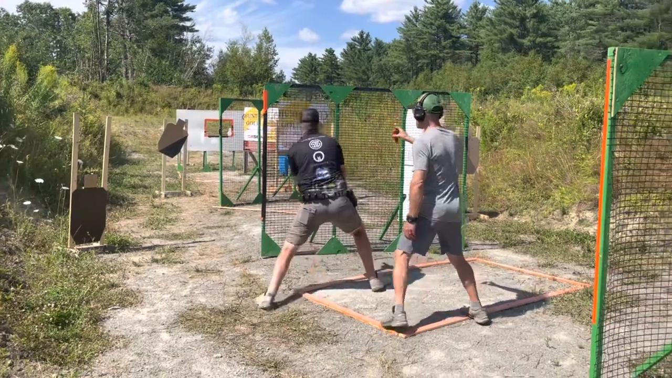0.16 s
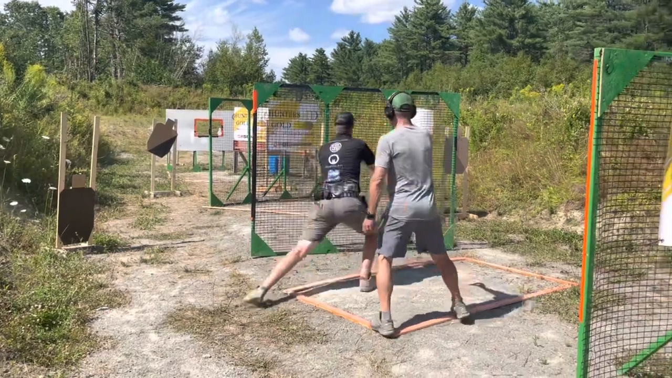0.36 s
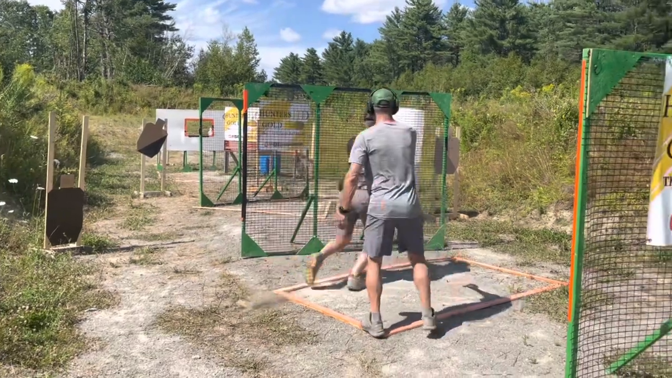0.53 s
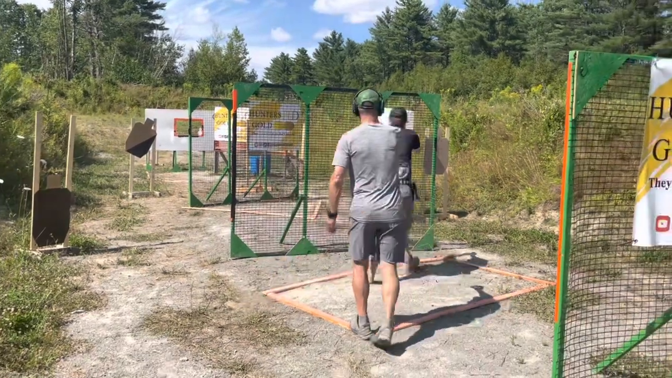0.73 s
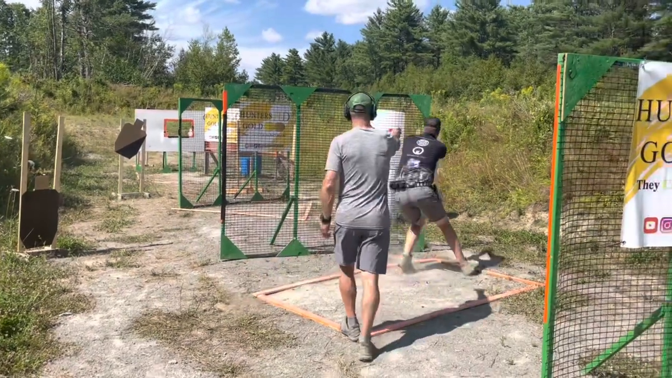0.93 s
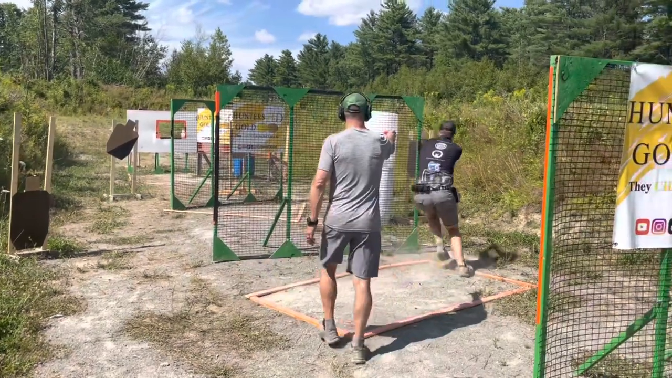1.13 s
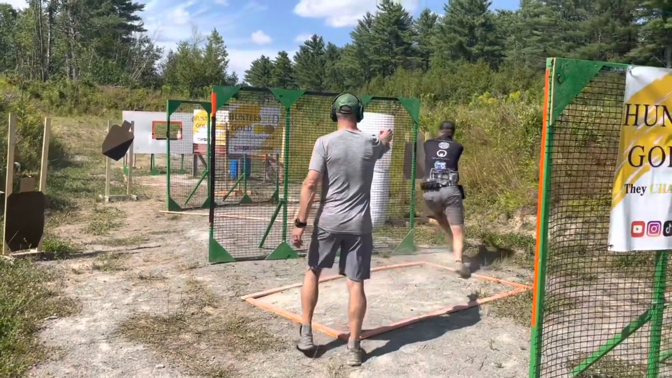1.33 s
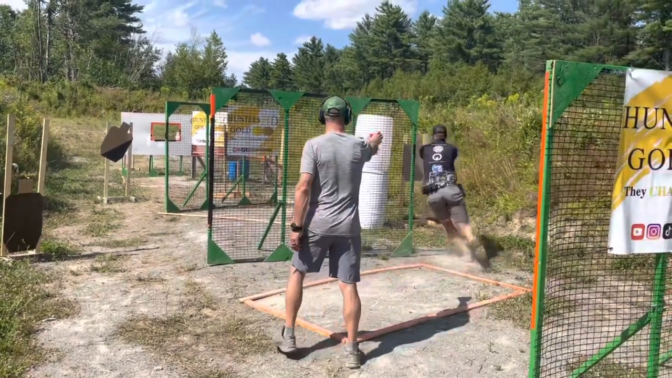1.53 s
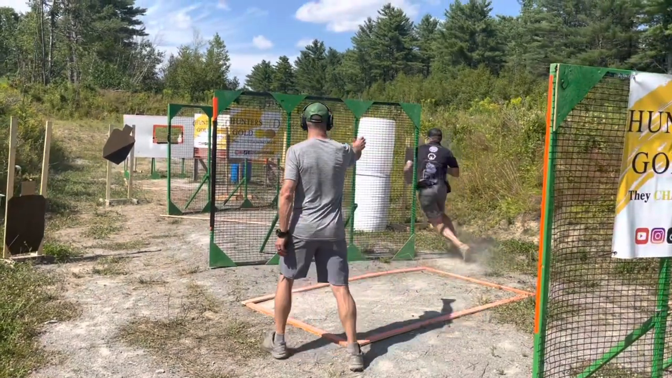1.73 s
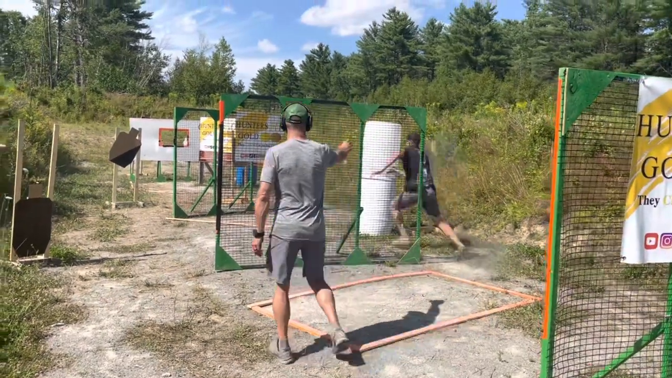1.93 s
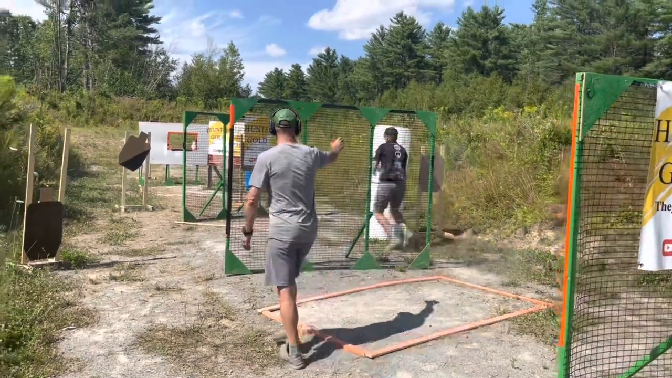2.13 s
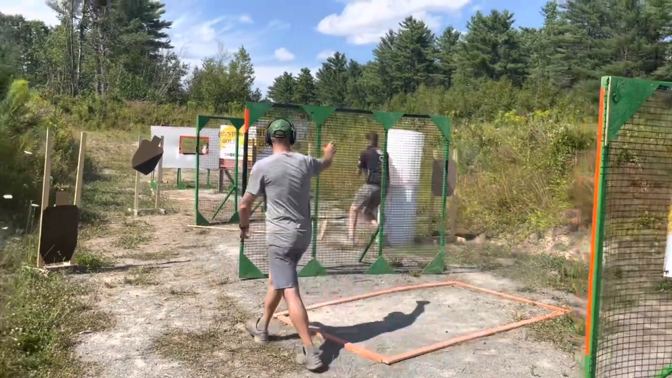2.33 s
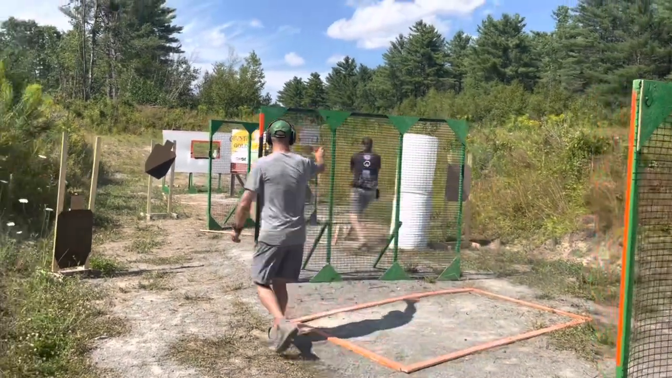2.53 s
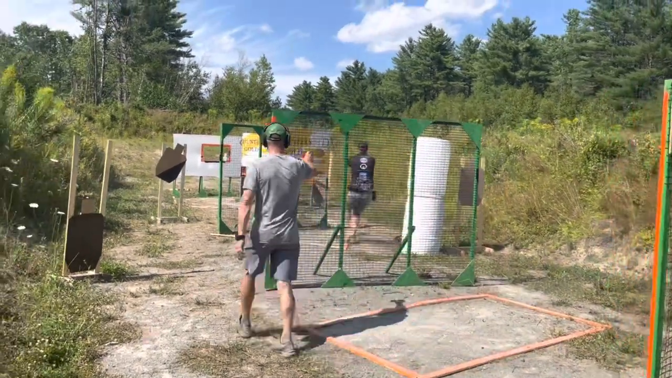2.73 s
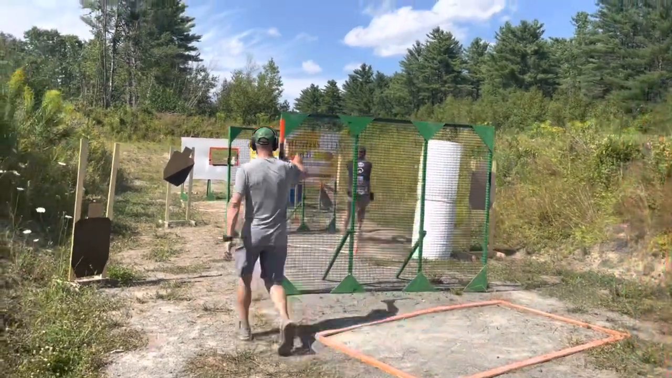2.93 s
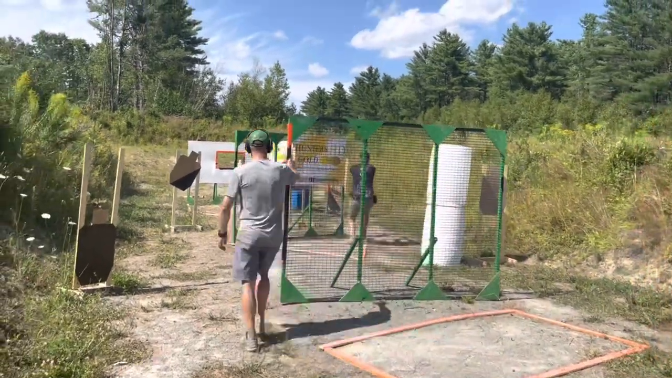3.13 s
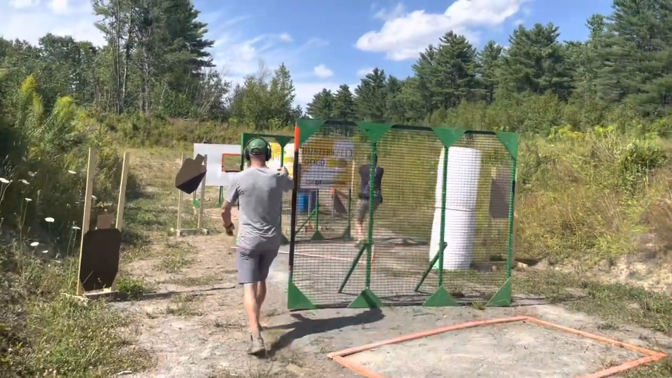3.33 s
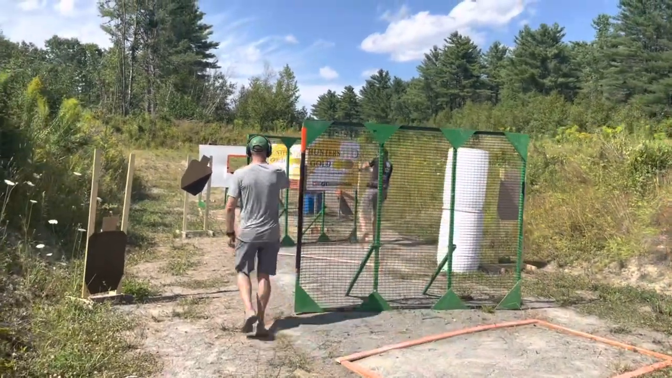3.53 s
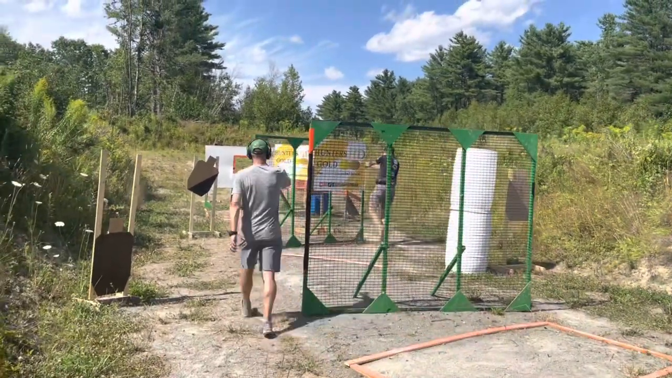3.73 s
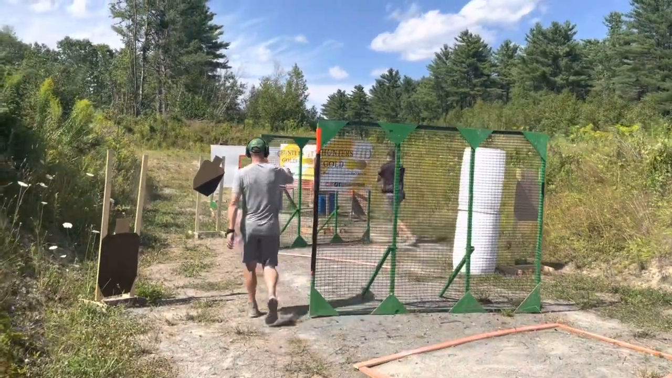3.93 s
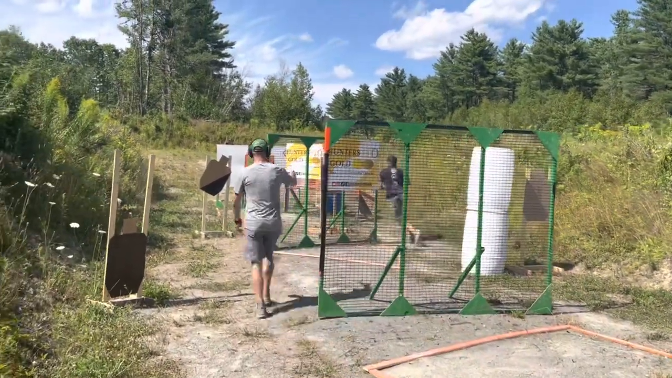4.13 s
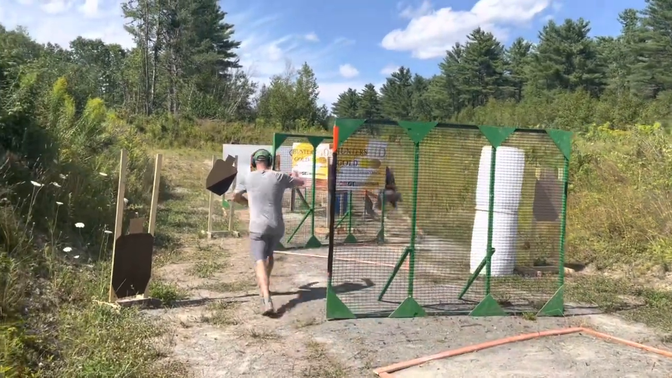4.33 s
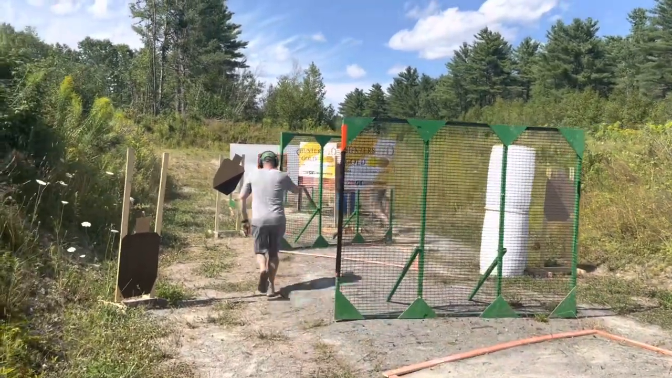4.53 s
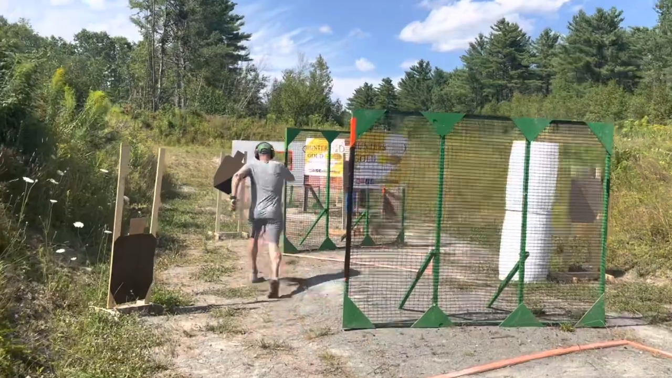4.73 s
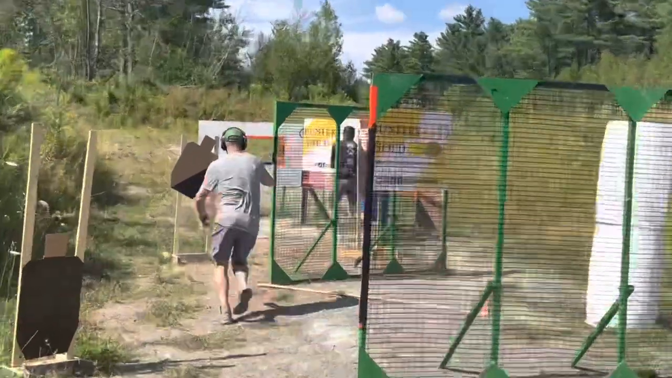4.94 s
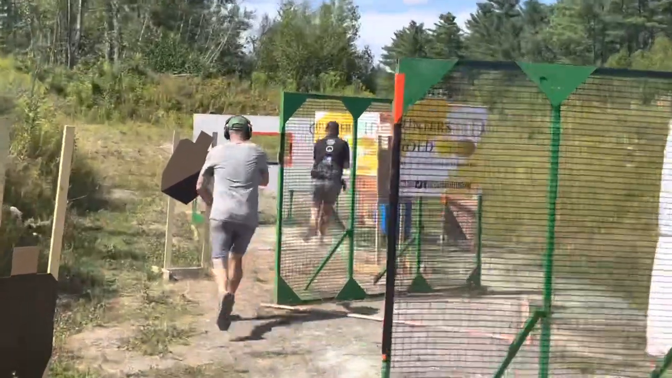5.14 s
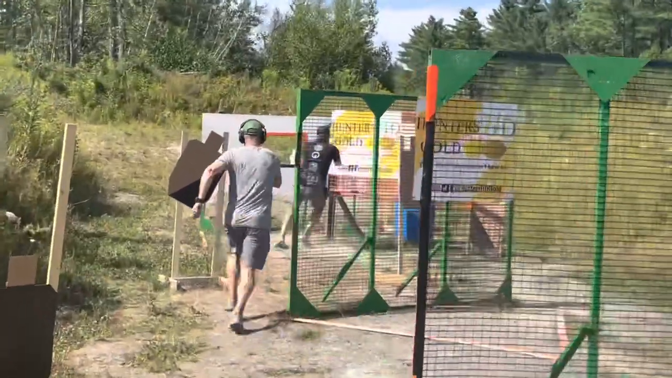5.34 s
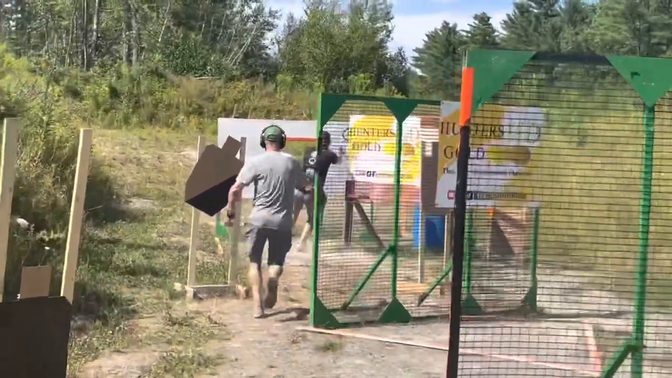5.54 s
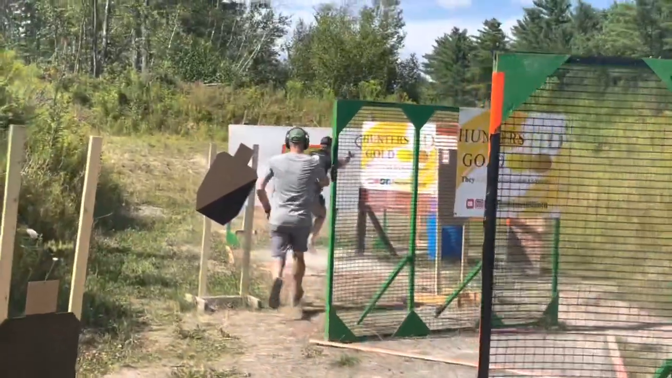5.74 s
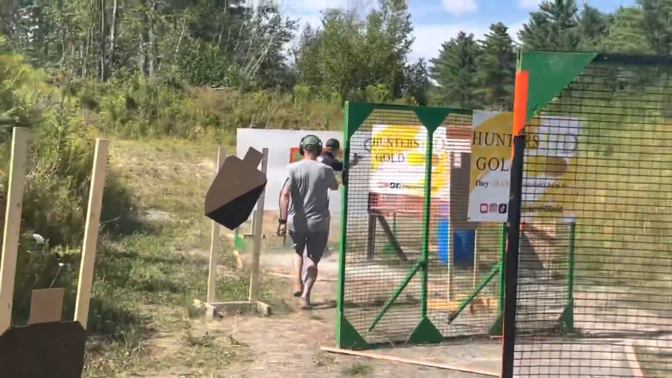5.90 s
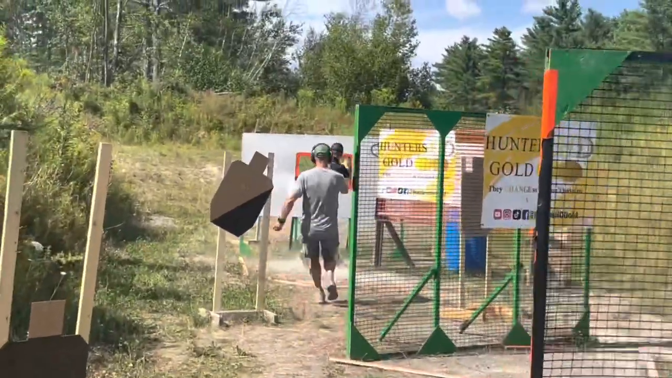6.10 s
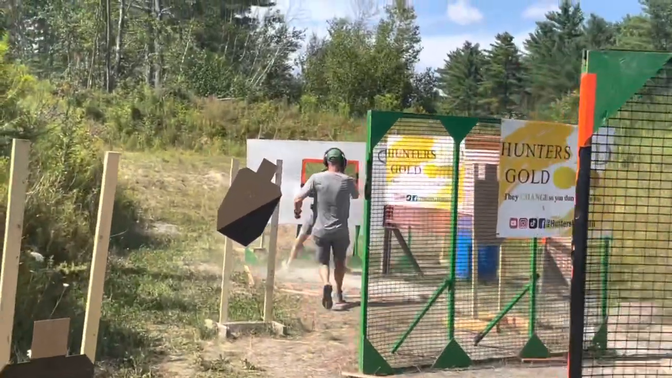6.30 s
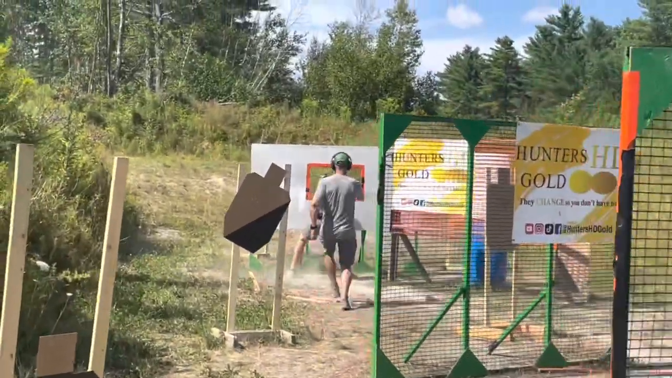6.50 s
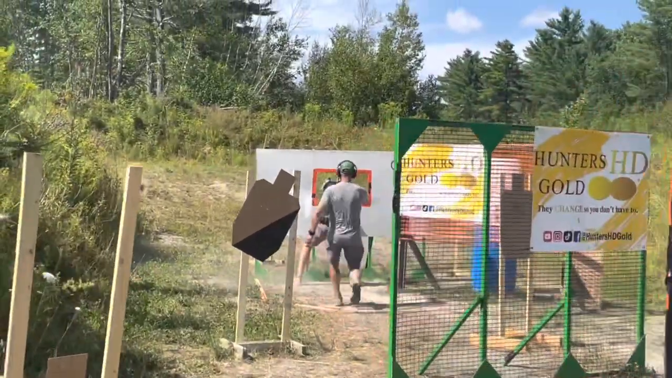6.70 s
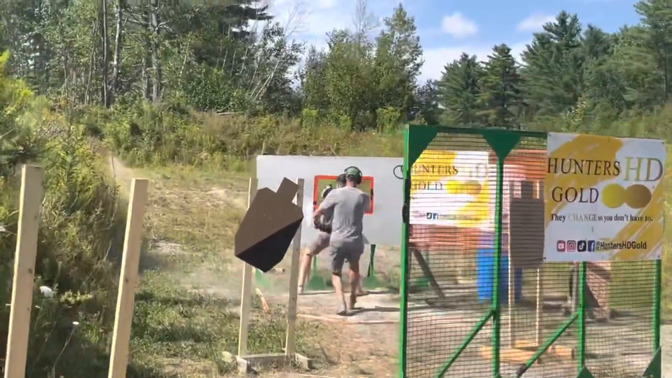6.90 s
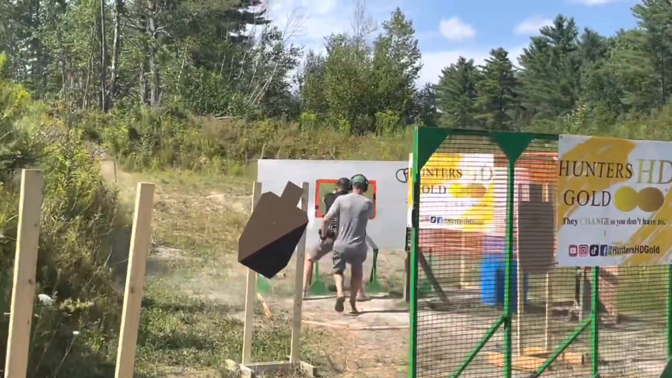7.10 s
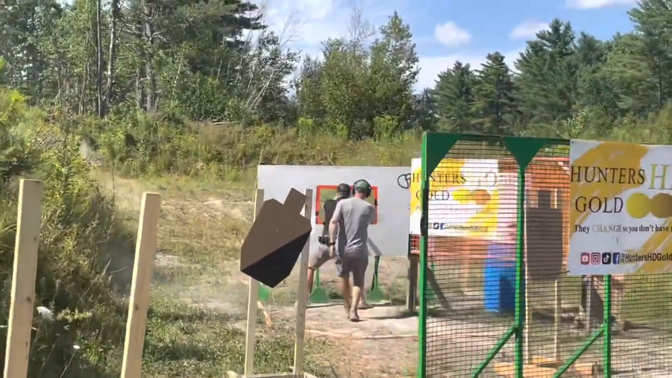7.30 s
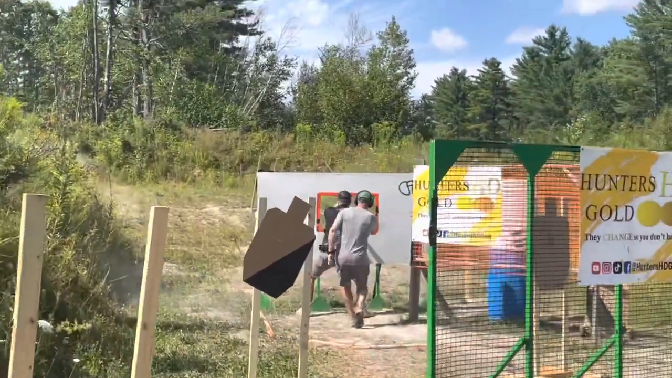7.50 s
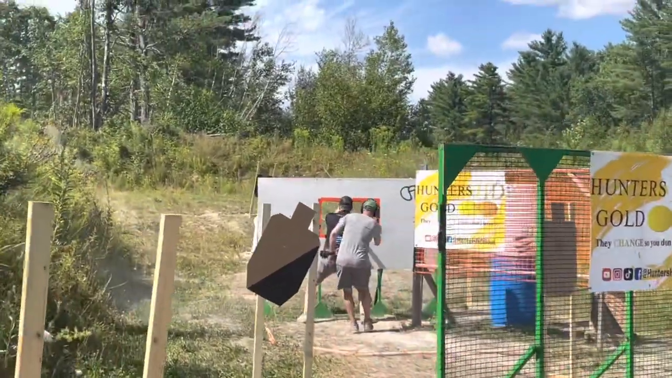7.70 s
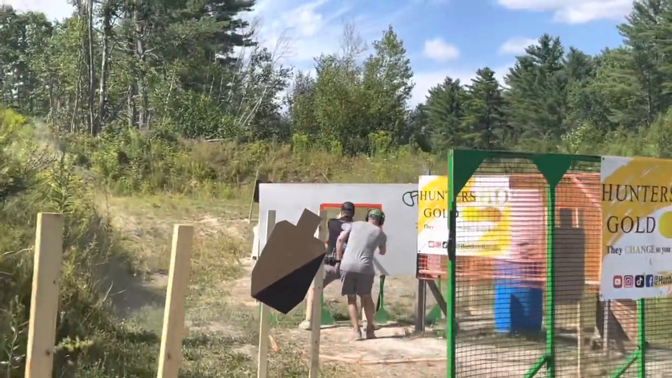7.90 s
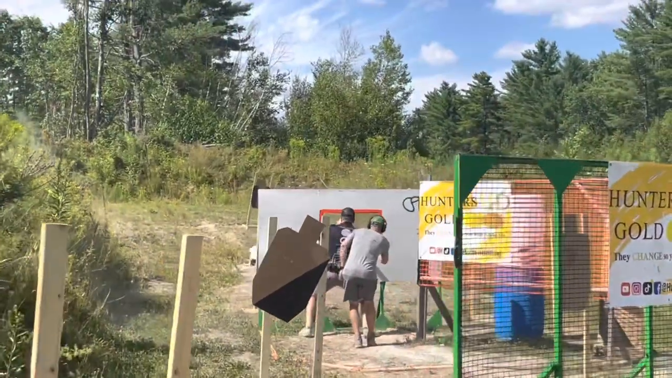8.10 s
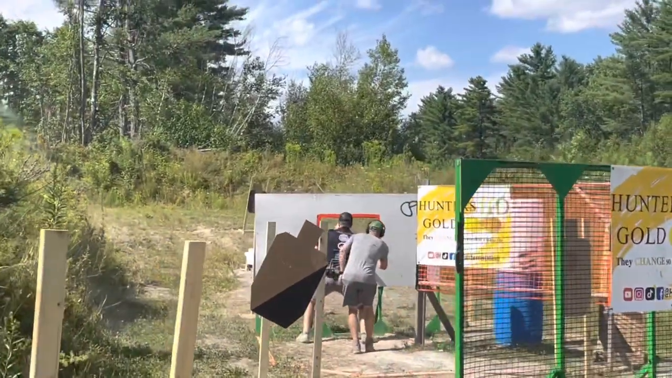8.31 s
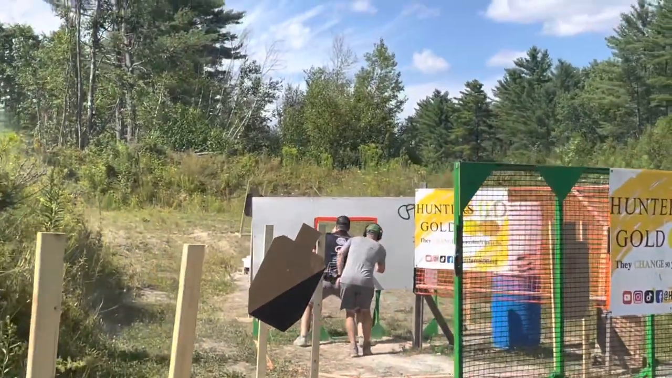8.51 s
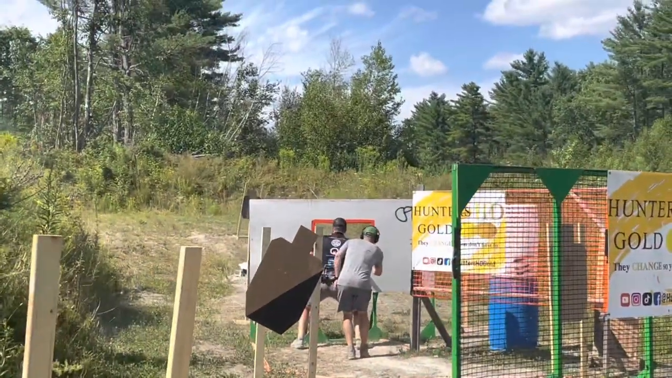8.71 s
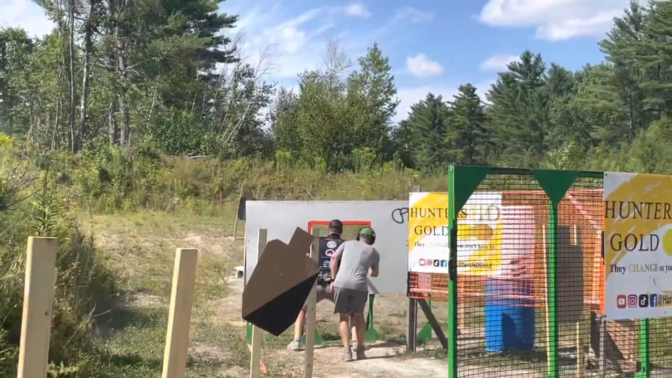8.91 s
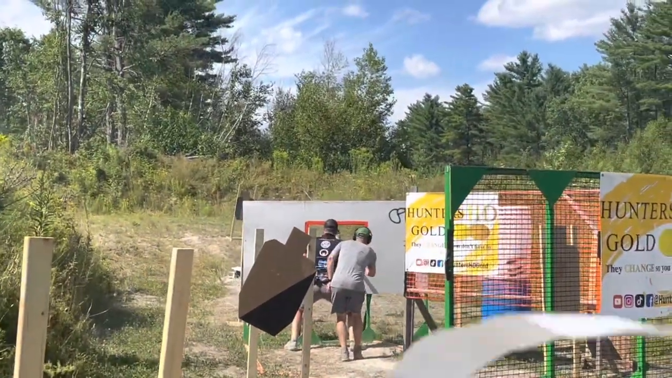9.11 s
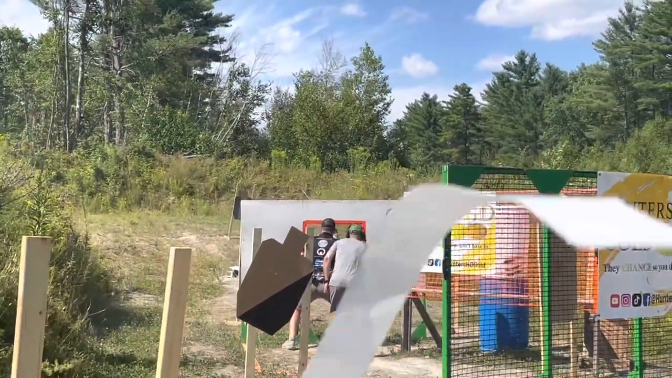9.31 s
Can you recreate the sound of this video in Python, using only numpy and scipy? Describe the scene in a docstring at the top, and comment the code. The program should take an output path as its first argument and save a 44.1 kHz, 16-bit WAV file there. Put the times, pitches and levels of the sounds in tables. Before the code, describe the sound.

A shooter fires fast pairs of booming pistol shots outdoors, each bouncing off banks and trees, while dull pops sound from neighbouring bays.

```python
"""Handgun course in a wooded bay

A competitor fires a handgun from four positions in an outdoor bay with earth banks and forest behind.
Each blast is a pulse plus crackle that bounces off ground, screens and banks; the forest roll is fading noise.
Bullets land as noise smacks, two with ringing sines; dull pops come from neighbouring bays.
Gravel crunches in grainy bursts, mostly under shoes, and shaped noise makes the open air.
The small recorder overloads and turns itself down after every blast."""
import sys
import numpy as np
from scipy import signal
from scipy.fft import rfft, irfft, next_fast_len
from scipy.io import wavfile
from scipy.ndimage import uniform_filter1d, minimum_filter1d

SR = 44100
rng = np.random.default_rng(int(sys.argv[2]) if len(sys.argv) > 2 else 0)


def generate_wav(sig):
    """Save sig (samples, or channels by samples) to the path in sys.argv[1] as 16-bit PCM at SR."""
    pcm = np.round(np.clip(np.atleast_2d(sig).T, -1, 1) * 32767).astype(np.int16)
    wavfile.write(sys.argv[1], SR, pcm)


N = 412335

# In all tables, t60 is the time a sound takes to fall by 60 dB.
# Handgun shots; a negative time means only the tail is heard. Boom and crack tilt the tone:
# (time [s], blast level [dB], extra boom [dB], extra crack [dB])
SHOTS = [(-.13, 6.5, 18.5, -9), (1.2469, -8.5, 4.5, -4.5), (1.43, -6, 3, -4), (3.064, -7, 13.5, 1),
         (3.2618, -10, -4, 4), (3.5667, -9, 2.5, -1), (3.7378, -7.5, .5, -3), (5.7071, -5, 1, -2.5),
         (5.9113, -5.5, 2.5, 1), (6.641, -12, 0.5, -3.5), (6.8913, -11.5, 0.5, -2.5), (7.1413, -11, 1, -3),
         (7.6357, -11, 0.5, -3.5), (8.079, -10.5, 2.5, -2.5), (8.4788, -10, 1, -2.5),
         (8.8354, -12, 0.5, -2)]
# Echoes at each firing position, before the boom of a shot shifts ground, screen and side bank:
# (ground delay [s], ground level [dB], screen delay [s], screen level [dB],
#  side bank level [dB], far bank level [dB], scatter level [dB], scatter t60 [s])
POSITIONS = [(.0085, -5.5, .014, -6.5, -5, -9, -0.5, .21), (.0036, -6.5, 0.0067, -11, -2.5, -26, -3, 0.2),
             (.0032, -3, .0071, 0, -20.5, -27, -7, .18), (.0034, -6.5, 0.0093, -9, -13, -11.5, -5, 0.25)]
# Blast tone before boom and crack: (frequency [Hz], then level [dB] at position one, two, three, four)
BLAST_COLOUR = [(34.8, -6, -16, -15, -19), (71, -1.5, -7.5, -4, -8), (140, -7, -4, -5.5, -5.5),
                (220, -6, 1.5, 4.5, -8), (444, -9.5, -5.5, -.5, -0.5), (620, -6, 2, 0.5, -2),
                (787, -0.5, 0, -15, -1), (1400, -3.5, 1.5, -1.5, -5.5), (2020, -14, -4, -19.5, -11.5),
                (2500, -14, -10.5, -18, -14), (3150, -15, -13.5, -14.5, -12),
                (8500, -19, -21, -25.5, -20.5), (14700, -19, -22, -27.5, -24),
                (16000, -37, -35.5, -35.5, -34)]
# When the shooter reaches each position: (time [s])
ARRIVALS_S = [.99, 2.99, 5.0, 6.0]
# Echo from the side bank once the shooter has settled at each position: (delay [s])
SIDE_BANK_S = [.0277, .034, .0505, .0425]
# Echo from the far bank at each position: (delay [s])
FAR_BANK_S = [.0635, .085, .068, .05]
# Each position lies slightly to one side: (left minus right [dB])
PAN_DB = [.6, -.5, -.6, -0.73]
# Tone of the roll from the forest: (frequency [Hz], relative level [dB], t60 [s])
FOREST = [(40, -1.5, 5.1), (90.5, 0.5, 1.7), (193, -5.5, 1.8), (566, 4, 2.5), (1150, -1, 2.3),
          (2500, -5.5, 1.9), (4800, -5.5, 0.77), (8250, -13, 1), (11800, -22, 0.33), (16000, -27, 0.4)]
# Tone of the open air: (frequency [Hz], relative level [dB])
AIR = [(25, -15), (55, -8.5), (88, 1.5), (125, -21.5), (250, -21), (450, -22.5), (900, -25.5), (1500, -28),
       (2700, -34.5), (5000, -44), (8000, -51.5), (13000, -46), (16000, -50.5)]
# Noise bursts on gravel: hard shoe scuffs and, at 8.2 s, probably a bullet landing:
# (time [s], level [dB], centre [Hz], t60 [s])
GRAVEL_BURSTS = [(.421, -48, 2160, 0.034), (1.179, -63, 4000, 0.15), (4.458, -60, 1500, 0.018),
                 (8.2, -39, 2500, .07)]
# Shots in neighbouring bays; boom tilts the tone: (time [s], level [dB], extra boom [dB])
FAR_SHOTS = [(1.7963, -39.5, 13.5), (2.1661, -34.5, 6), (2.531, -50.5, 9), (4.418, -46, 8.5),
             (4.595, -48.5, -3), (4.69, -49, 13), (4.7384, -28.5, 6.5), (5.375, -55, -2),
             (5.644, -53.5, -4), (6.396, -42.5, -3)]
# Tone of those far shots before boom and crack: (frequency [Hz], relative level [dB])
FAR_COLOUR = [(35, -19.5), (70, -13), (130, -4.5), (300, -8), (600, -1), (850, 3), (1250, -12),
              (2000, -42.5), (5000, -56), (16000, -75.5)]
# Bullets landing: (time [s], smack level [dB], smack t60 [s])
HITS = [(7.1875, -20, 0.089), (7.7135, -31.5, 0.017), (8.157, -30.5, 0.018), (8.2, -37.5, 0.09),
        (8.558, -30, 0.016), (8.8975, -25.5, 0.12)]
# Tone of the smack: (frequency [Hz], relative level [dB])
SMACK_COLOUR = [(100, 7), (1000, 15), (3000, 11.5), (7000, 14.5), (14000, 6), (16000, -12)]
# Ringing tones of the heavy plate: (frequency [Hz], relative level [dB], t60 [s])
PLATE = [(799, -10.5, 1.3), (1410, -18, 0.46), (4200, -27.5, 0.67), (6400, -25, 0.43), (13800, -10, 0.21),
         (14170, -16, .15)]
# Ringing tones of the thin steel: (frequency [Hz], relative level [dB], t60 [s])
THIN_STEEL = [(1750, -26.5, 0.56), (4200, -36, .4), (4900, -31, 0.075), (6800, -18.5, 0.3),
              (11400, -22, 0.26), (12322, 1.5, 0.12), (12790, -30, .06), (14090, -11, .1)]
# Phase between the two microphone ports: (frequency [Hz], left ahead of right [radians])
PORT_PHASE = [(30, 0), (550, 0), (850, .8), (1200, 0), (2400, .1), (3600, .7), (5080, .6), (5770, -1.1),
              (6800, -.7), (7600, -2.3), (8700, -3.1), (11500, -5.6), (13500, -6.3)]

# Short sounds last SIZE samples: their clock (s) and their frequencies (Hz)
SIZE = 16384
T = np.arange(SIZE) / SR
HZ = np.fft.rfftfreq(SIZE, 1 / SR)

# the aim that brings more boom also sends more to ground and screens, less to the side bank (dB per dB of boom)
NEAR_DB_PER_BOOM, BANK_DB_PER_BOOM = 0.9, -0.45
# firing starts on the move: the side echo is this much later on arrival, and settles with this time constant (s)
RUN_IN_S, SETTLE_S = .008, .42
# lower mids linger between the banks: level against the direct blast (dB), band (Hz), t60 (s)
LINGER_DB, LINGER_HZ, LINGER_T60_S = -25, (250, 700), .36
# the forest answers louder as the shooter advances: starting level (dB), gain by course end (dB), course length (s)
ROLL_DB, ROLL_GAIN_DB, COURSE_S = -49, 8, 8.6
# the roll gains treble too: by course end, far above this pitch (dB); half of it at this pitch (Hz)
ROLL_TREBLE_DB, ROLL_TREBLE_HZ = 4, 9006
# open air: calm level (dB), when it begins to swell (s), how fast (dB per s)
AIR_CALM_DB, AIR_SWELL_FROM_S, AIR_SWELL_DB_PER_S = -69, 2.5, 2.17
# ordinary steps: average spacing (s), level and its spread (dB), centre (Hz), t60 (s)
STEP_S = .27
STEP_DB, STEP_SPREAD_DB, STEP_HZ, STEP_T60_S = -69, 3.5, 1900, .2
# far shots: extra treble (dB), and their forest roll relative to the pop (dB)
FAR_CRACK_DB, FAR_ROLL_DB = 8.5, -37.5
# the two bullets that ring steel: time (s), ring level (dB)
PLATE_HIT, THIN_STEEL_HIT = (7.1875, -20), (8.8975, -14)
# overload ceiling (1 is the loudest sample value) and the top cut (Hz)
FULL_SCALE, CUTOFF_HZ = .8, 16200


def from_db(db):
    """Turn decibels into a plain multiplier."""
    return 10 ** (np.asarray(db) / 20)


def at_hz(points, hz, axis=1):
    """Read a table column between its rows, along a log-frequency axis."""
    table = np.array(points)
    return np.interp(np.log(hz + 1e-3), np.log(table[:, 0]), table[:, axis])


def unit(x):
    """Scale to an average energy of one per channel."""
    energy = np.mean(np.sum(x ** 2, axis=-1))
    return x / np.sqrt(energy + 1e-20)


def fade(t, t60):
    """Die away exponentially, by 60 dB in t60 seconds."""
    return np.exp(-np.log(1000) * t / max(t60, 1e-3))


def add(out, s, sound):
    """Mix a sound in at a time in seconds, trimming what falls outside."""
    at = round(s * SR)
    first, last = max(at, 0), min(at + sound.shape[-1], N)
    out[:, first:last] += sound[..., first - at:last - at]


def noise(size, side_db):
    """Stereo white noise; more side means less alike in the two channels."""
    mid, side = rng.standard_normal((2, size))
    side_gain = from_db(side_db)
    return (mid + side_gain * side * [[1], [-1]]) / np.hypot(1, side_gain)


def lumps(per_s):
    """Slow random ups and downs with a spread of about one."""
    places = np.arange(N) / SR * min(per_s, 200)
    return np.interp(places, np.arange(2000), rng.standard_normal(2000))


def colour(spectrum, curve_db, level_db):
    """Shape the tone of a short sound without smearing it ahead of time, let it die out, set its level."""
    # folding the cepstrum forward gives a filter that never responds early
    cepstrum = irfft(np.log(from_db(curve_db)))
    cepstrum[1:SIZE // 2] *= 2
    cepstrum[SIZE // 2 + 1:] = 0
    shaped = irfft(spectrum * np.exp(rfft(cepstrum)))
    ending = np.clip(3 - 4 * T / T[-1], 0, 1)
    # the level counts the energy as if spread over 20 ms
    return from_db(level_db) * np.sqrt(SR / 50) * unit(ending * shaped)


def shelves(boom_db, crack_db, boom_hz=280, crack_hz=2200):
    """Curve in dB that lifts or lowers the bass (boom) and the treble (crack)."""
    boom = boom_db / (1 + (HZ / boom_hz) ** 4)
    crack = crack_db / (1 + (crack_hz / (HZ + 1)) ** 4)
    return boom + crack


def path(delay_s, db):
    """One reflection: a delay and a level, as a spectrum."""
    return from_db(db) * np.exp(-2j * np.pi * HZ * delay_s)


def shock(ragged_hz, t60):
    """A pressure jump: one clean pulse in the lows, torn into a short crackle in the highs."""
    lows = signal.butter(2, ragged_hz, fs=SR, output="sos")
    highs = signal.butter(2, ragged_hz, "high", fs=SR, output="sos")
    pulse = (T == 0) + 1e-18
    crackle = unit(noise(SIZE, side_db=-14.5) * fade(T, t60)) + 1e-18
    return rfft(signal.sosfilt(lows, pulse) + signal.sosfilt(highs, crackle))


def side_bank_delay(s, k):
    """The way to the side bank shortens as the shooter slows into position k."""
    return SIDE_BANK_S[k] + RUN_IN_S * np.exp(-max(s - ARRIVALS_S[k], 0) / SETTLE_S)


def linger():
    """A dull, hollow tail of the blast trapped in the bay, made of fading mid-range noise."""
    band = signal.butter(2, LINGER_HZ, "band", fs=SR, output="sos")
    tail = signal.sosfilt(band, noise(SIZE, side_db=-9) * fade(T, LINGER_T60_S))
    return from_db(LINGER_DB) * rfft(unit(tail))


def handgun():
    """Blast and near echoes; shots from one position share most of their scatter off gravel and props."""
    out = np.zeros((2, N))
    props = [noise(SIZE, side_db=-6) for _ in POSITIONS]
    for s, db, boom_db, crack_db in SHOTS:
        k = np.searchsorted(ARRIVALS_S[1:], s)
        ground_s, ground_db, screen_s, screen_db, side_db, far_db, scatter_db, scatter_t60 = POSITIONS[k]
        near_db = NEAR_DB_PER_BOOM * boom_db
        bank_db = side_db + BANK_DB_PER_BOOM * boom_db
        direct = shock(ragged_hz=1500, t60=0.017)
        # at a grazing angle, soft ground turns the wave upside down
        ground = -shock(ragged_hz=1200, t60=0.023) * path(ground_s, ground_db + near_db)
        screen = shock(ragged_hz=1200, t60=0.019) * path(screen_s, screen_db + near_db)
        # each bank has its own tone; the longer way to the far one swallows more treble
        bank = shock(ragged_hz=1900, t60=.009) * path(side_bank_delay(s, k), bank_db)
        bank = bank * from_db(shelves(boom_db=1.5, crack_db=3))
        far_bank = shock(ragged_hz=1500, t60=.018) * path(FAR_BANK_S[k], far_db)
        far_bank = far_bank * from_db(shelves(boom_db=5.0, crack_db=-8))
        # small props scatter short waves best
        grains = props[k] + 0.64 * noise(SIZE, side_db=-8.0)
        scatter_curve = scatter_db + shelves(boom_db=0.5, crack_db=5, boom_hz=440, crack_hz=1500)
        scatter = rfft(unit(grains * fade(T, scatter_t60))) * from_db(scatter_curve)
        # the longest waves pass over banks and props
        echoes = bank + far_bank + scatter + linger()
        echoes = echoes * from_db(shelves(boom_db=-9, crack_db=0.5, boom_hz=123))
        # boom and crack change with the way the muzzle points
        tone = at_hz(BLAST_COLOUR, HZ, axis=k + 1) + shelves(boom_db, crack_db)
        pan = from_db(PAN_DB[k] * np.array([[.5], [-.5]]))
        add(out, s, pan * colour(direct + ground + screen + echoes, tone, db))
    return out


def roll_level(s, hz):
    """Level in dB of the forest's answer, at one pitch, to a shot fired at this time."""
    treble_db = ROLL_TREBLE_DB / (1 + (ROLL_TREBLE_HZ / hz) ** 2)
    return ROLL_DB + (ROLL_GAIN_DB + treble_db) * (s / COURSE_S) ** 2


def forest(tree_line_s=.17, swell_s=0.01, early_db=-9, clump_db=2.0, patchy_db=2.0):
    """The roll swells when the blast returns from the tree line, clump by clump; each pitch band fades its own way."""
    out = np.zeros((2, N))
    t = np.arange(3 * SR) / SR
    early = from_db(early_db)
    swell = early + (1 - early) / (1 + np.exp((tree_line_s - t) / swell_s))
    edges = np.geomspace(25, 17000, 17)
    centres = np.sqrt(edges[1:] * edges[:-1])
    gains = unit(from_db(at_hz(FOREST, centres)) * np.sqrt(np.diff(edges)))
    white = [noise(N, side_db=-10.0) for _ in range(2)]
    clumps = clump_db * lumps(per_s=160)  # shared by all bands
    for k, hz in enumerate(centres):
        near_blasts = [(s, roll_level(s, hz)) for s, *_ in SHOTS]
        far_blasts = [(s, db + FAR_ROLL_DB) for s, db, _ in FAR_SHOTS]
        band_pass = signal.butter(2, edges[k:k + 2], "band", fs=SR, output="sos")
        band = signal.sosfilt(band_pass, white[k % 2])
        dying = fade(np.maximum(t - tree_line_s, 0), at_hz(FOREST, hz, axis=2))
        roll_power = (swell * dying) ** 2
        # overlapping rolls add up as power
        power = np.zeros((1, N))
        for s, roll_db in near_blasts + far_blasts:
            add(power, s, roll_power * from_db(roll_db) ** 2)
        uneven = from_db(clumps + patchy_db * lumps(per_s=92))
        out += gains[k] * np.sqrt(power * N) * unit(band * uneven)
    return out


def open_air():
    """Shaped noise: a low rumble and faint rustle, calm at first, then slowly swelling."""
    size = next_fast_len(N)
    tone = from_db(at_hz(AIR, np.fft.rfftfreq(size, 1 / SR)))
    air = irfft(rfft(noise(size, side_db=-11)) * tone, size)[:, :N]
    swelling_s = np.maximum(np.arange(N) / SR - AIR_SWELL_FROM_S, 0)
    return np.sqrt(N) * unit(air) * from_db(AIR_CALM_DB + AIR_SWELL_DB_PER_S * swelling_s)


def gravel(skirt_db=-15):
    """Gravel crunches in bursts of uneven grains: a loose run of steps, hard scuffs and probably a bullet."""
    out = np.zeros((2, N))
    steps = []
    for k, (early_late, weight) in enumerate(rng.standard_normal(size=(28, 2))):
        s = STEP_S * (k + early_late / 4)
        steps.append((s, STEP_DB + STEP_SPREAD_DB * weight, STEP_HZ, STEP_T60_S))
    for s, db, hz, t60 in GRAVEL_BURSTS + steps:
        grains = noise(SIZE, side_db=-7.5) * rng.exponential(1, SIZE) * fade(T, t60)
        # the tone falls away on both sides of its centre
        octaves = np.log2((HZ + 10) / hz)
        add(out, s, colour(rfft(grains), skirt_db * np.log2(1 + octaves ** 2), db))
    return out


def neighbours():
    """Shots behind the banks arrive as dull pops: a pulse with a little noisy scatter."""
    out = np.zeros((2, N))
    for s, db, boom_db in FAR_SHOTS:
        scatter = from_db(-2.5) * rfft(unit(noise(SIZE, side_db=1) * fade(T, t60=0.059)))
        tone = at_hz(FAR_COLOUR, HZ) + shelves(boom_db, FAR_CRACK_DB)
        add(out, s, colour(1 + scatter, tone, db))
    return out


def ring(modes):
    """Struck steel: a sum of sines, each dying away at its own pace."""
    t = np.arange(SR) / SR
    return sum(from_db(db) * fade(t, t60) * np.sin(2 * np.pi * hz * t) for hz, db, t60 in modes)


def bullets():
    """Each bullet lands with a bright smack of noise; two set steel ringing."""
    out = np.zeros((2, N))
    for s, db, t60 in HITS:
        smack = noise(SIZE, side_db=-37) * fade(T, t60)
        add(out, s, colour(rfft(smack), at_hz(SMACK_COLOUR, HZ), db))
    for (s, db), modes in ((PLATE_HIT, PLATE), (THIN_STEEL_HIT, THIN_STEEL)):
        add(out, s, from_db(db) * ring(modes))
    return out


def scene():
    """Everything that reaches the microphone."""
    return handgun() + forest() + open_air() + gravel() + neighbours() + bullets()


def microphone(x, lag_cycles=1.2, lowest_hz=20):
    """Lows come late, so each blast sweeps downward; the two ports differ in phase."""
    size = next_fast_len(N + SR)
    hz = np.fft.rfftfreq(size, 1 / SR)
    lag = -2 * np.pi * lag_cycles * np.log1p(hz / lowest_hz)
    ports = at_hz(PORT_PHASE, hz) * np.array([[.5], [-.5]])
    return irfft(rfft(x, size) * np.exp(1j * (lag + ports)), size)[:, :N]


def gain_control(x, threshold_db=-27, depth_db=9, hold_s=0.044, release_db_per_s=130, attack_s=0.047):
    """A blast pulls the gain down; it holds, then recovers."""
    power = np.abs(uniform_filter1d(np.mean(x ** 2, axis=0), size=256))
    level = 10 * np.log10(power + 1e-12)
    wanted_cut = np.clip(level - threshold_db, 0, depth_db)
    # hold: keep the deepest recent cut
    hold = max(int(hold_s * SR), 1)
    cut = -minimum_filter1d(-wanted_cut, hold, origin=(hold - 1) // 2)
    # release: the cut may shrink only at a steady pace
    ramp = release_db_per_s * np.arange(N) / SR
    cut = np.maximum.accumulate(cut + ramp) - ramp
    # smooth the cut so that it sets in gradually
    r = np.exp(-1 / (attack_s * SR))
    return x * from_db(-signal.lfilter([1 - r], [1, -r], cut))


def record(dry):
    """Microphone, gain control, soft overload and the top cut."""
    steadied = gain_control(microphone(dry))
    loud = FULL_SCALE * np.tanh(steadied / FULL_SCALE)
    top_cut = signal.ellip(10, .1, 80, CUTOFF_HZ, fs=SR, output="sos")
    return signal.sosfilt(top_cut, loud)


dry = scene()
out = record(dry)
generate_wav(out)
```